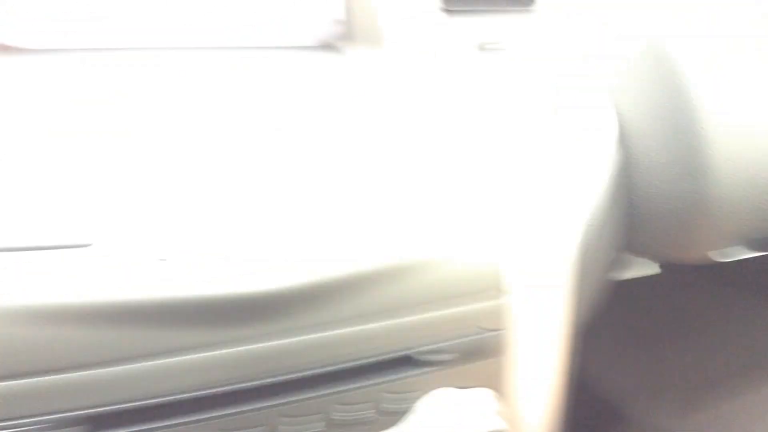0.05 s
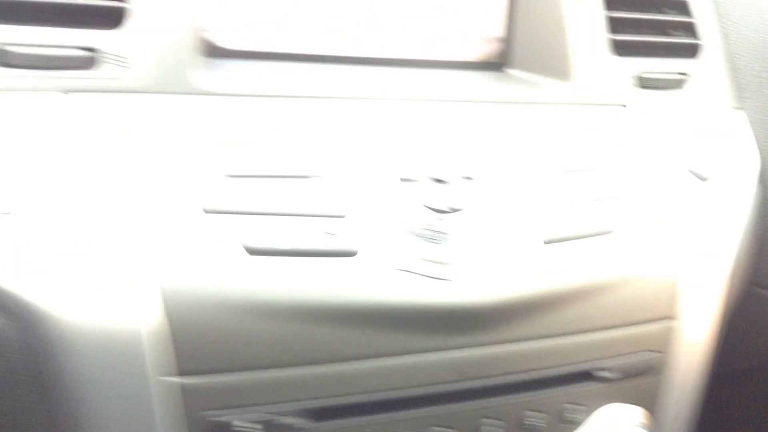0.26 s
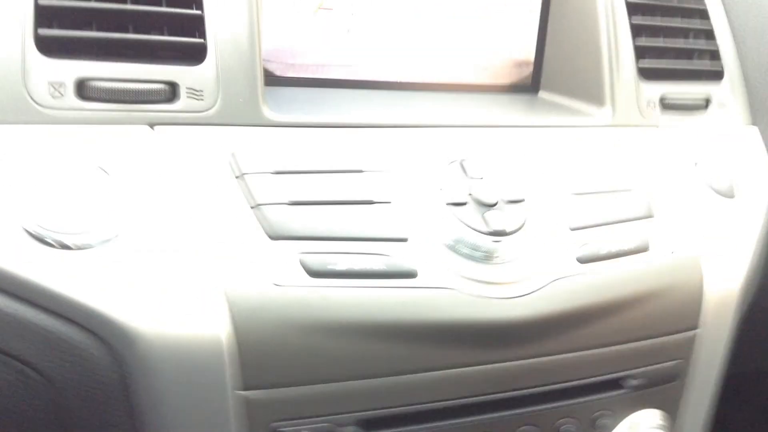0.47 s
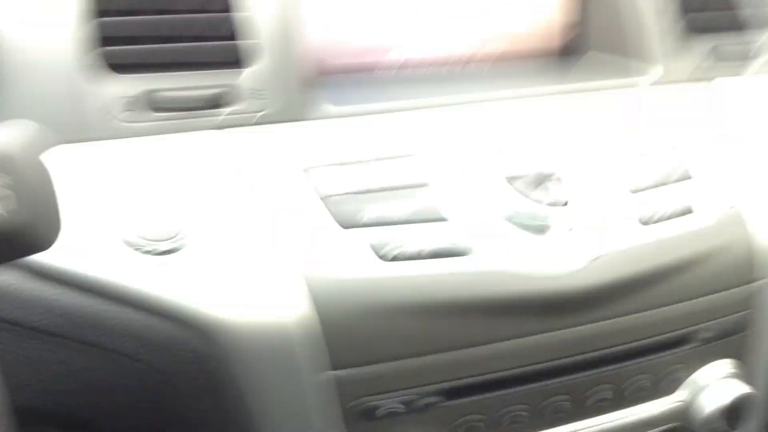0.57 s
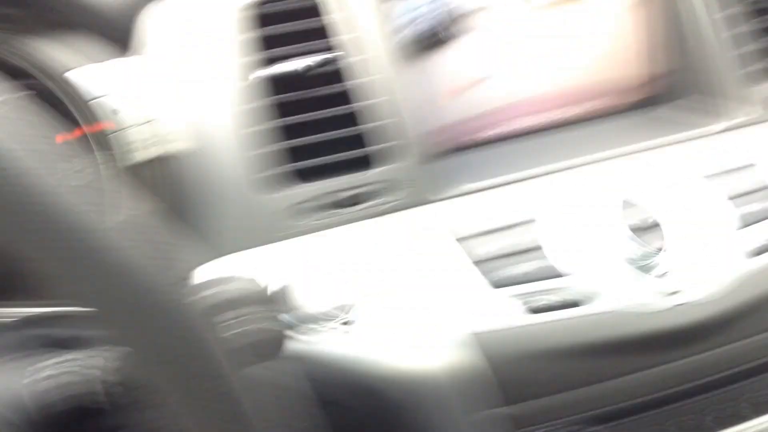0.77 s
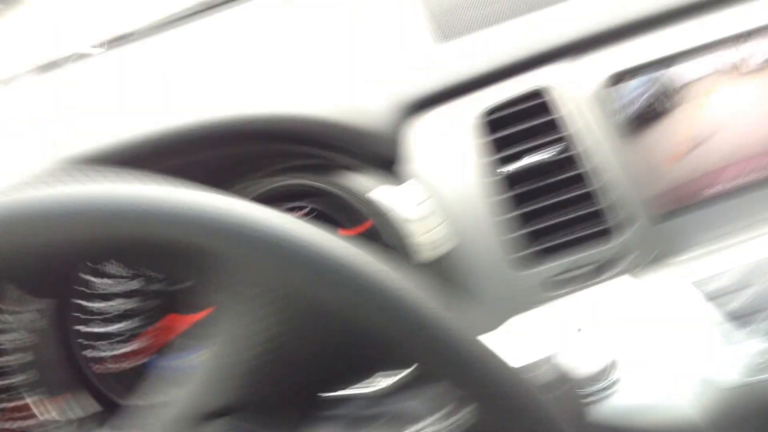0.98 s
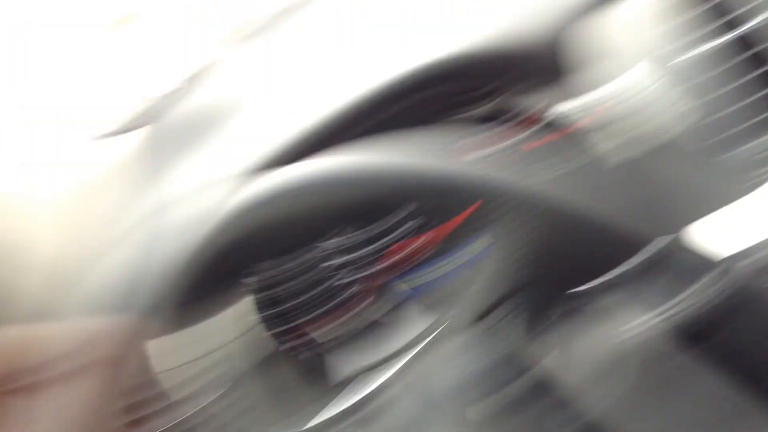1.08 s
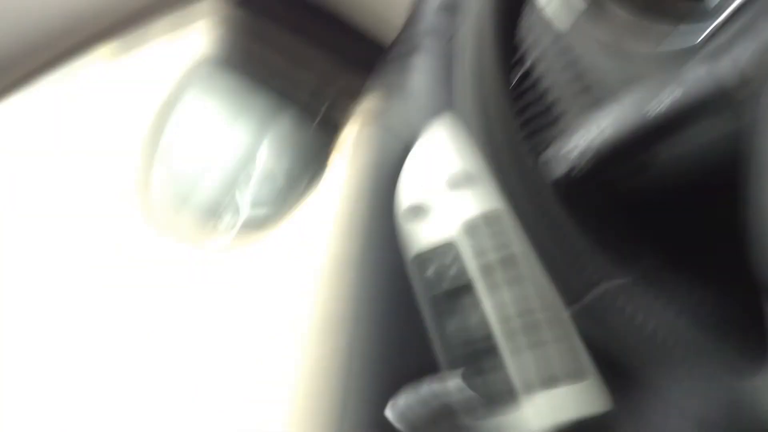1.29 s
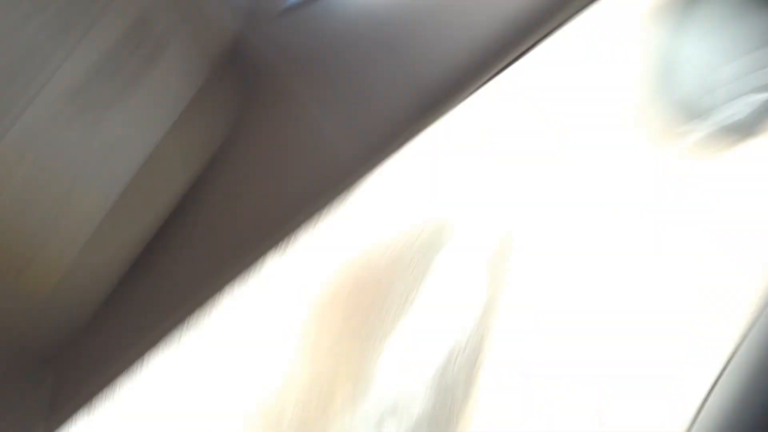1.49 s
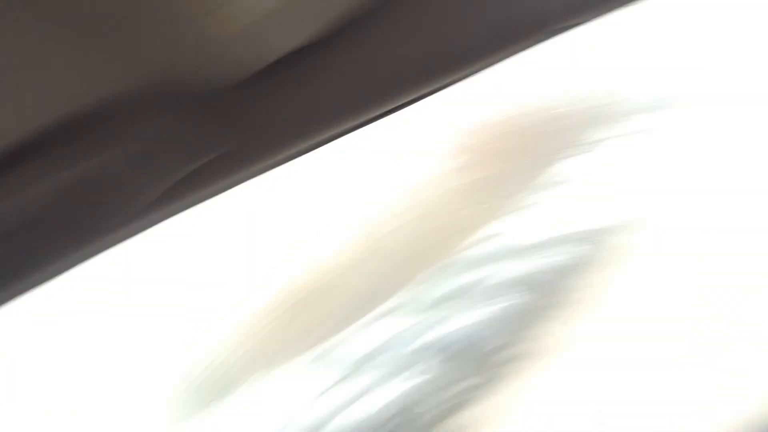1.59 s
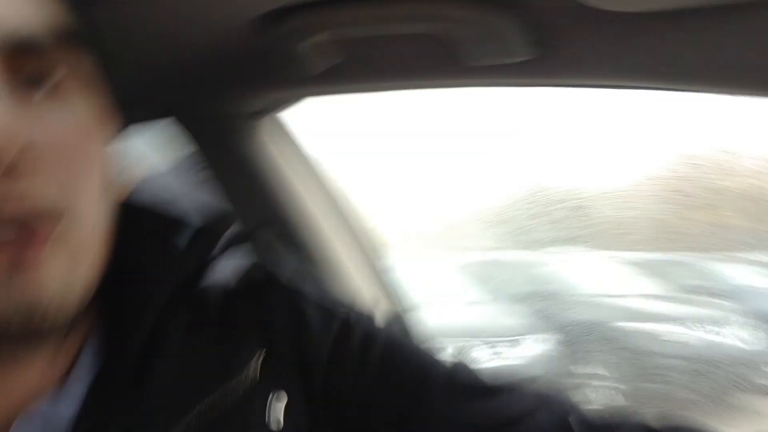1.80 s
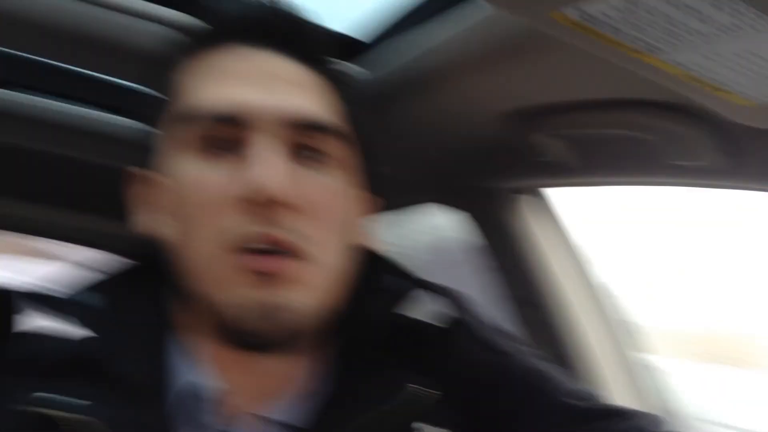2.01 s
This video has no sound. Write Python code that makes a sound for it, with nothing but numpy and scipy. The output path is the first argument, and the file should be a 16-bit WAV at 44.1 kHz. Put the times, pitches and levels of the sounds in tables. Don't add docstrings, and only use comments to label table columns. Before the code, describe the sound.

A plastic glove box lid slams shut in a parked car, then handling taps and rustles

```python
import sys
import numpy as np
from scipy import signal
from scipy.fft import rfft, irfft, next_fast_len
from scipy.io import wavfile

SR = 44100
rng = np.random.default_rng(int(sys.argv[2]) if len(sys.argv) > 2 else 0)


def linear_from_db(decibels):
    return 10 ** (np.asarray(decibels, float) / 20)


def master_out(mix):
    frames = np.transpose(np.atleast_2d(mix))
    ceiling = np.clip(frames, -1, 1)
    pcm = np.round(ceiling * 32767).astype(np.int16)
    wavfile.write(sys.argv[1], SR, pcm)


N = 90404


def rms_one(x):
    return x / np.sqrt(np.mean(x ** 2) + 1e-20)


def in_time(rows):
    s, *columns = np.transpose(rows)
    return [np.interp(np.arange(N) / SR, s, c) for c in columns]


def since(s):
    t = np.arange(N) / SR - s
    return np.maximum(t, 0), t >= 0


def butter(x, order, hz, kind="low"):
    return signal.sosfilt(signal.butter(order, hz, kind, fs=SR, output="sos"), x)


def coloured(x, points):
    hz, db = np.transpose(points)
    edges = 28 * 2 ** np.arange(0, 9.6, .5)
    out = 0
    for k, (lo, hi) in enumerate(zip(edges, edges[1:])):
        gain = linear_from_db(np.interp(np.log(lo * hi) / 2, np.log(hz), db))
        out = out + gain * butter(x, 2, [lo, hi], "band") * (-1) ** k
    return out


def peak(x, hz, width_hz):
    r = np.exp(-np.pi * width_hz / SR)
    poles = [1, -2 * r * np.cos(2 * np.pi * hz / SR), r * r]
    return signal.lfilter(np.array([1, 0, -1]) * (1 - r * r) / 2, poles, x)


def noise_peak(hz, width_hz):
    return rms_one(peak(rng.standard_normal(N), hz, width_hz))


def ring(x, hz, t60):
    r, w = linear_from_db(-60 / (t60 * SR)), 2 * np.pi * hz / SR
    return signal.lfilter([0, np.sin(w)], [1, -2 * r * np.cos(w), r * r], x + 1e-18)


def gliding_band(hz, width_hz):
    r = np.exp(-np.pi * width_hz / SR)
    slow = signal.lfilter([1], [1, -r], rng.standard_normal(N) + 1j * rng.standard_normal(N))
    return rms_one(np.real(slow * np.exp(2j * np.pi * np.cumsum(hz) / SR)))


def grains(per_s, spread_db):
    sizes = linear_from_db(spread_db * np.minimum(rng.exponential(1, N), 4)) * rng.choice([-1, 1], N)
    return rms_one(sizes * (rng.random(N) < per_s / SR))


# frequency in Hz, level in dB per Hz.
CABIN_AIR = [(18, -48), (30, -11.5), (202, 6.5), (830, -10), (1510, -1), (3680, -10), (4660, -21),
             (6050, -15), (15500, 0)]
# time in seconds, level in dB over the hush.
STIR = [(0, 7.5), (.2, 5.5), (.4, 1), (.9, 3.6), (1.12, 3.5), (1.28, -1.5), (1.45, 9), (1.58, 3.5),
        (1.75, 7.5), (2.05, 6)]
HUSH_DB, RUMBLE_DB = -51.5, -16.5
TOP_DB, TOP_FADE_DB_PER_S = -4, -2.5


def hush():
    air = rms_one(coloured(rng.standard_normal(N), CABIN_AIR))
    (stir_db,) = in_time(STIR)
    dull = butter(air, 2, 2500)
    top = air - butter(air, 2, 9000)
    middle = air - dull - top
    dull = dull - 0.32 * peak(dull, 670, 410)
    top_db = 0.86 * stir_db + TOP_DB + TOP_FADE_DB_PER_S * np.arange(N) / SR
    moving = linear_from_db(stir_db) * middle + linear_from_db(top_db) * top
    boom = linear_from_db(-3) * noise_peak(193, 180) + linear_from_db(RUMBLE_DB) * noise_peak(29, 40)
    return linear_from_db(HUSH_DB) * (dull + moving + boom + linear_from_db(-7.5) * noise_peak(1850, 710))


# time in seconds, air level in dB, gap resonance in Hz.
LID_SWING = [
    (0, -66, 900),
    (.09, -56, 980),
    (.15, -49, 1100),
    (.2, -44, 1200),
    (.228, -44, 1250),
    (.232, -120, 1250),
]


def swing():
    db, gap_hz = in_time(LID_SWING)
    box_hz, box_width_hz = 2300, 1300
    box = rms_one(peak(peak(rng.standard_normal(N), box_hz, box_width_hz), box_hz, 1.6 * box_width_hz))
    return linear_from_db(db) * (gliding_band(gap_hz, 140) + linear_from_db(2.5) * box)


# start in seconds, rise in seconds, fall in seconds, level in dB.
RUB_STROKES = [(.1, 0.098, .03, -67), (0.353, 0.0047, .02, -41), (.48, 0.15, .04, -41.5),
               (0.628, 0.023, 0.028, -37.5), (.75, 0.15, .06, -56), (0.967, 0.0066, 0.028, -36.5),
               (0.986, .004, 0.041, -31), (0.998, 0.034, 0.04, -26.5), (1.031, 0.025, 0.0069, -26),
               (1.061, 0.016, 0.0088, -43), (1.301, 0.0083, 0.026, -25.5), (1.349, 0.023, 0.083, -38),
               (1.458, .025, 0.056, -38)]


def rubs():
    t = np.arange(N) / SR
    stroke = 0
    for s, rise, fall, db in RUB_STROKES:
        swell = np.clip((t - s) / rise, 0, 1) ** 2
        decay = np.exp(-2 * np.maximum(t - s - rise, 0) / fall)
        stroke = stroke + linear_from_db(db) * np.where(t < s + rise, swell, decay)
    grit = rms_one(butter(grains(14000.0, 0), 2, [3700, 9000], "band"))
    coarse = linear_from_db(-2.5) * grains(12000.0, 3.4)
    body = linear_from_db(-8) * rms_one(peak(grains(3300.0, 2.0), 1580, 960))
    return stroke * linear_from_db(-12) * (grit + coarse + body)


# start in seconds, rattle level in dB, rattle t60 in seconds, body level in dB.
LID_CONTACTS = [
    (0.2295, -8, .07, -8),
    (0.2426, -42, 0.049, -15),
    (0.2483, -25, 0.048, -16.5),
    (0.2539, -9.5, 0.06, -27),
    (.266, -26, 0.03, -10),
]
# frequency in Hz, level in dB per Hz.
RATTLE_SPECTRUM = [(180, -31), (300, -1.5), (708, 1.5), (1020, 1.5), (2560, -3), (4070, -17.5), (6360, -23),
                   (10800, -8.5), (15500, -29)]
# frequency in Hz, level in dB, t60 in seconds.
LID_MODES = [(103.7, -6, 0.2), (130, -6.5, 0.28), (191, -20, 0.075), (207, -2, 0.15), (265, 0.5, 0.13),
             (523, -13.5, 0.14), (780, -17, 0.036), (864, -9, 0.1), (986, -11.5, 0.08), (1044, -21, 0.04),
             (1422, -15.5, 0.052), (1614, -2, 0.029), (1986, -19, 0.064), (2170, -1, 0.017),
             (2560, -3.5, 0.015)]
BODY_LAG_S, FIRM_BELOW_HZ = 0.0071, 300


def slam():
    chatter = rms_one(coloured(grains(8100, 3.6), RATTLE_SPECTRUM))
    chatter = chatter - 0.37 * peak(chatter, 690, 290)
    loose, push, firm = 0, 0, 0
    for s, db, t60, body_db in LID_CONTACTS:
        t, on = since(s)
        loose = loose + on * linear_from_db(db - 60 * t / t60) * np.minimum(t / 0.0018, 1)
        push = push + on * linear_from_db(body_db - 22 - 60 * t / 0.028)
        lump = t / BODY_LAG_S * np.exp(-(t / BODY_LAG_S) ** 2)
        sway = np.sin(2 * np.pi * 220 * t) + 0.37 * np.sin(2 * np.pi * 105 * t)
        firm = firm + linear_from_db(body_db - 44) * lump * sway
    out = chatter * loose
    for hz, db, t60 in LID_MODES:
        force = firm if hz < FIRM_BELOW_HZ else push * rng.standard_normal(N)
        out = out + linear_from_db(db) * ring(force, hz, t60)
    return out


def latch():
    t, on = since(LID_CONTACTS[0][0] + 0.001005)
    return linear_from_db(-11) * noise_peak(1890, 270) * on * linear_from_db(-60 * t / 0.048)


# start in seconds, tick level in dB, push level in dB, push frequency in Hz, push width in Hz.
FINGER_TAPS = [
    (0.3549, -35, -30, 2950, 700),
    (0.7895, -54, -34, 780, 885),
    (.797, -32.5, -46, 1520, 900),
    (0.842, -36.5, -52, 1500, 900),
    (.9583, -19, -22.5, 1670, 1170),
    (.9657, -14, -5.5, 1070, 1600),
    (0.9892, -38, -13.5, 770, 1320),
    (1.243, -37, -54, 1500, 900),
    (1.436, -48, -37.5, 4100, 1200),
    (1.5114, -15, -19.5, 2280, 650),
]
# frequency in Hz, level in dB, t60 in seconds.
SHELL_MODES = [(221.4, -26, 0.21), (339.5, -19.5, 0.094), (444, -11.5, 0.011)]


def taps():
    out, shell_hit = 0, np.zeros(N)
    noise = rng.standard_normal(N)
    for s, tick_db, push_db, hz, width_hz in FINGER_TAPS:
        t, on = since(s)
        skin = np.exp(-t / 0.0013) * noise
        click = linear_from_db(9) * np.exp(-t / .00005)
        snap = on * linear_from_db(tick_db - 7) * (skin + click)
        out = out + butter(snap + 1e-18, 3, 4630, "high") + linear_from_db(-8.5) * peak(snap, 0.3 * hz, 1700)
        spread = np.pi * width_hz * t
        out = out + linear_from_db(push_db + 6.5) * spread * np.exp(-spread) * np.sin(2 * np.pi * hz * t)
        shell_hit[int(s * SR)] = linear_from_db(push_db) * 900 / hz
    out = out + sum(linear_from_db(db) * ring(shell_hit, hz, t60) for hz, db, t60 in SHELL_MODES)
    return butter(out, 4, 184, "high")


# start in seconds, level in dB, length in seconds, level of the upper modes in dB.
ARM_KNOCKS = [(.39, -59.5, 0.011, 8), (0.786, -34.5, 0.016, -11.5), (0.844, -38.5, 0.0052, -8.5),
              (1.039, -31, 0.01, -3), (1.304, -36.5, 0.015, 8), (1.371, -48.5, 0.035, -9),
              (1.403, -39, 0.012, -7), (1.45, -37.5, 0.0061, -6.5), (1.52, -38.5, 0.004, -2),
              (1.647, -48.5, 0.0097, 1), (1.739, -51, 0.022, -5.5)]
# frequency in Hz, level in dB, t60 in seconds.
TRIM_MODES = [(228, 0, 0.047), (367, -6, 0.014), (547, 3, 0.058), (700, 4, 0.023), (830, 2.5, 0.034),
              (1080, 3, 0.018), (1185, 2.5, 0.05), (1318, 6.5, 0.018), (1550, 6, 0.0084), (2190, -2, 0.019)]


def knocks():
    thump, scuff = 0, 0
    low_hz = TRIM_MODES[0][0]
    for s, db, length, upper_db in ARM_KNOCKS:
        t, on = since(s)
        press = np.sin(np.pi * np.minimum(t / length, 1))
        thump = thump + linear_from_db(db - 36.5) * press * np.sin(2 * np.pi * low_hz * t)
        scuff = scuff + linear_from_db(db + upper_db - 14.5) * np.sqrt(t / length) * np.exp(-2.5 * t / length)
    out = 0
    for k, (hz, db, t60) in enumerate(TRIM_MODES):
        force = scuff * rng.standard_normal(N) if k else thump
        out = out + linear_from_db(db) * ring(force, hz, t60)
    return out


# time in seconds, level in dB, weave frequency in Hz.
SLEEVE_SWISH = [(.42, -120, 1724), (.46, -74, 1739), (.52, -60, 1712), (.6, -57, 1603), (.66, -54.5, 1508),
                (.7, -66.5, 1509), (.88, -66, 1550), (.95, -120, 1550)]


def sleeve():
    db, weave_hz = in_time(SLEEVE_SWISH)
    octave_db = 5 - 9 * (weave_hz < 1505)
    return linear_from_db(db) * (gliding_band(weave_hz, 110) + linear_from_db(octave_db) * gliding_band(2 * weave_hz, 165))


def cabin(x):
    t60_s, seat_cut_hz = .1, 4000
    size = next_fast_len(N + SR)
    w = 2 * np.pi * np.arange(size // 2 + 1) / size
    dull = 1 / (1 + 1j * w * SR / (2 * np.pi * seat_cut_hz))
    back = 0
    for k, lag in enumerate(rng.uniform(.004, .012, 8) * SR):
        one_pass = linear_from_db(-60 * lag / SR / t60_s) * dull * np.exp(-1j * w * lag)
        back = back + (-1) ** k * (1 / (1 - one_pass) - 1)
    return linear_from_db(-14) * irfft(rfft(x, size) * back, size)[:N]


def scene():
    far = swing() + slam() + latch() + sleeve()
    near = rubs() + taps() + knocks()
    return (hush() + far + cabin(far) + near)[None]


def low_pass(x):
    return signal.sosfilt(signal.butter(12, 16470, fs=SR, output="sos"), x)


def record(dry):
    x = butter(dry, 2, 70, "high")
    shell_dip = linear_from_db(-8.5) * peak(x, 3180, 800)
    port = linear_from_db(18) * peak(x, 6110, 970)
    limited = 0.7 * np.tanh((x - shell_dip + port) / 0.78)
    mix = signal.sosfilt(signal.cheby2(8, 30, 15560, fs=SR, output="sos"), limited)
    return low_pass(mix)


dry = scene()
out = record(dry)
master_out(out)
```